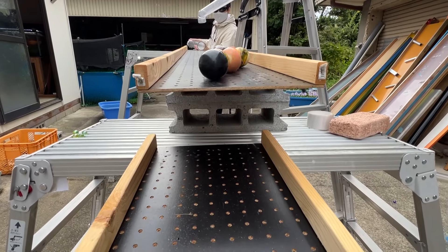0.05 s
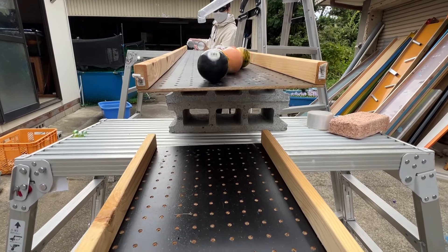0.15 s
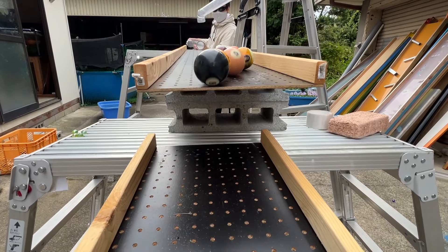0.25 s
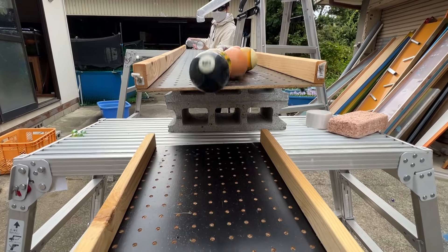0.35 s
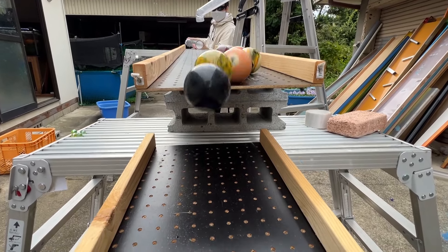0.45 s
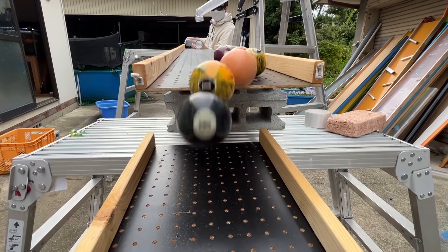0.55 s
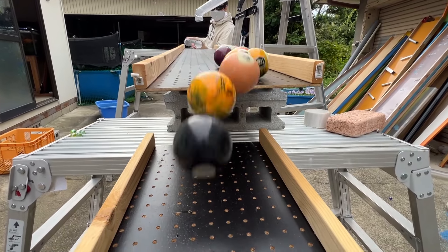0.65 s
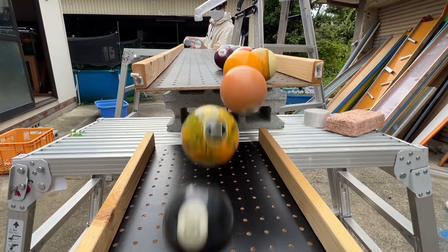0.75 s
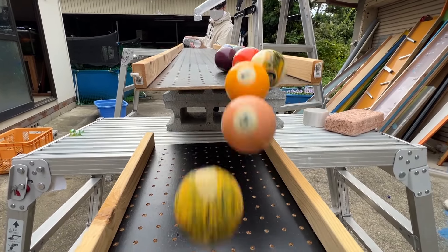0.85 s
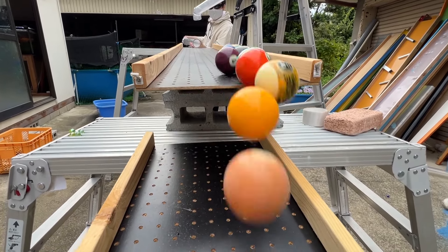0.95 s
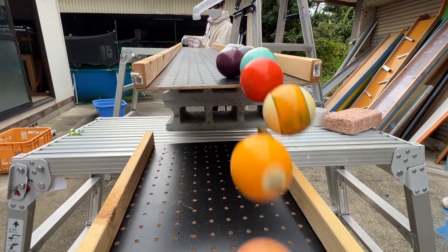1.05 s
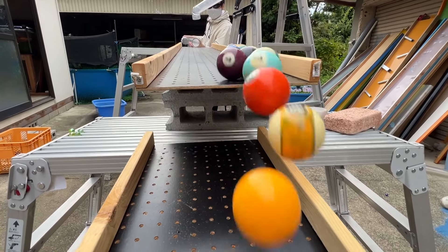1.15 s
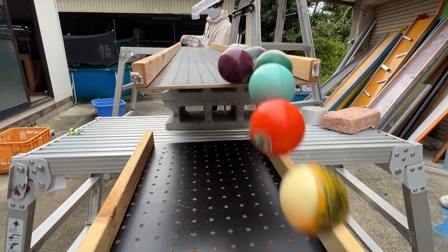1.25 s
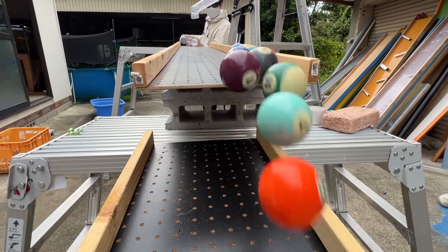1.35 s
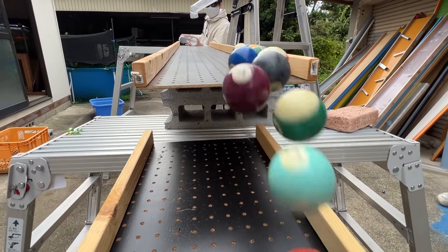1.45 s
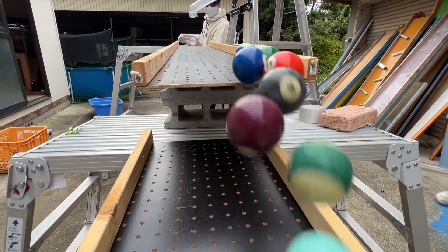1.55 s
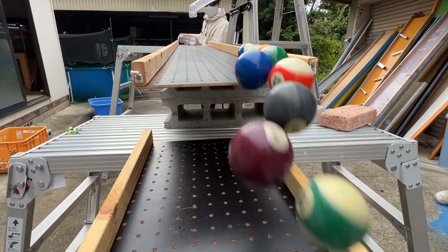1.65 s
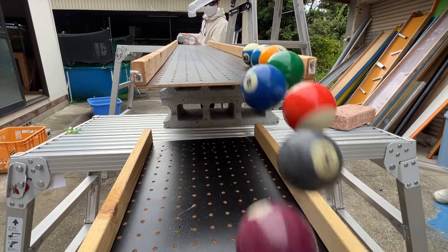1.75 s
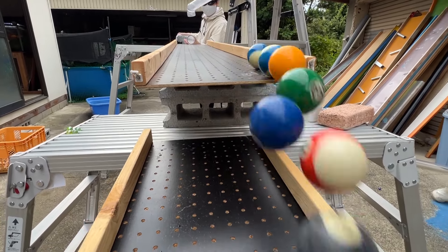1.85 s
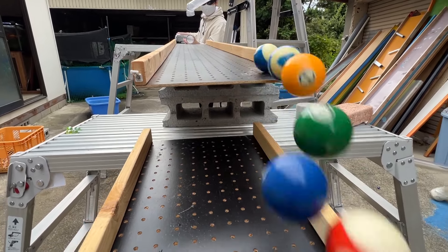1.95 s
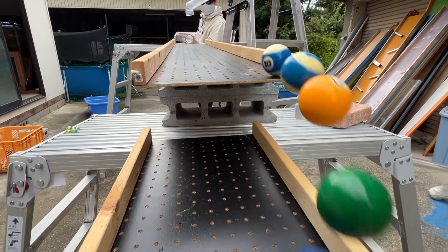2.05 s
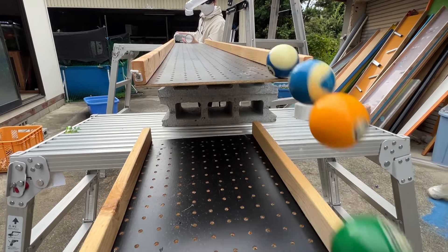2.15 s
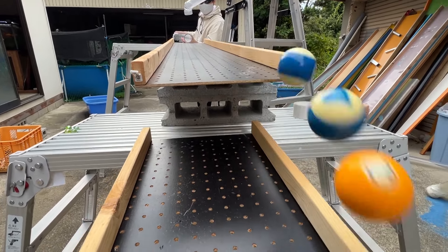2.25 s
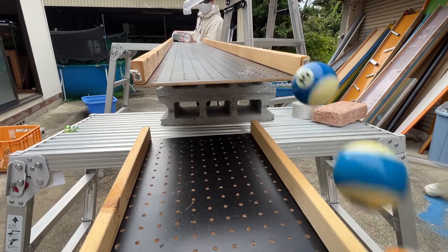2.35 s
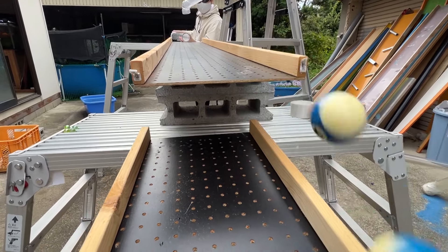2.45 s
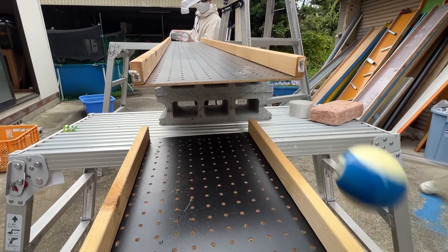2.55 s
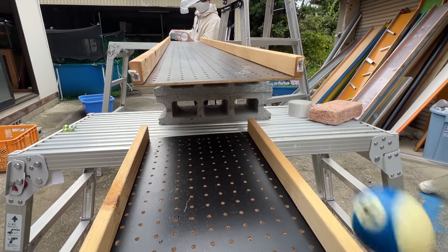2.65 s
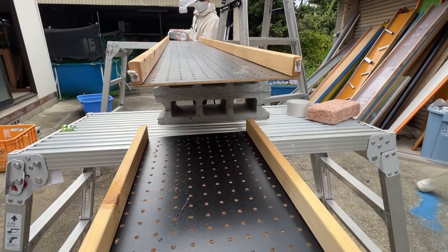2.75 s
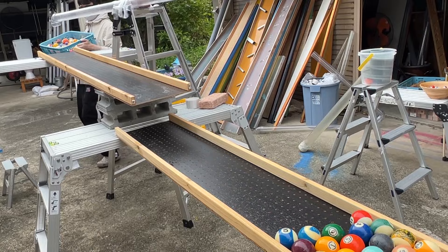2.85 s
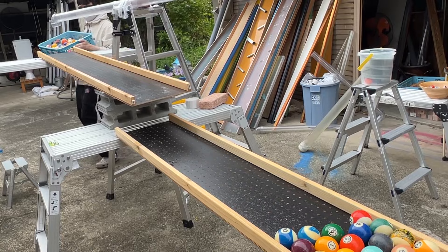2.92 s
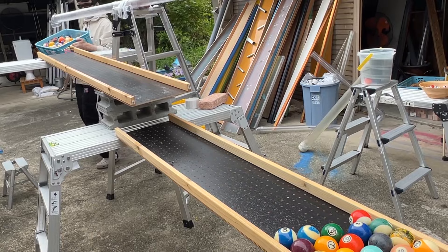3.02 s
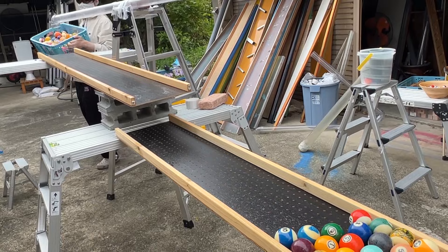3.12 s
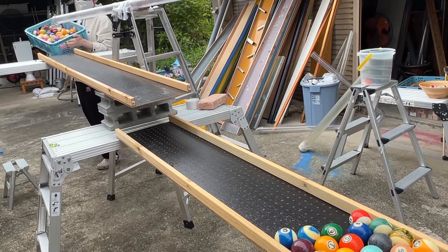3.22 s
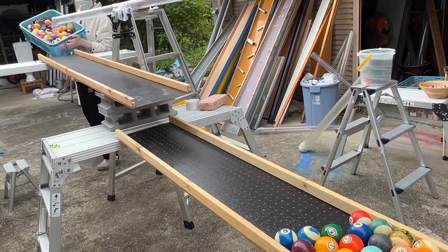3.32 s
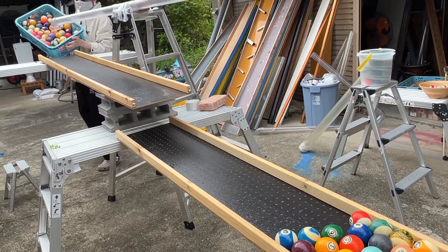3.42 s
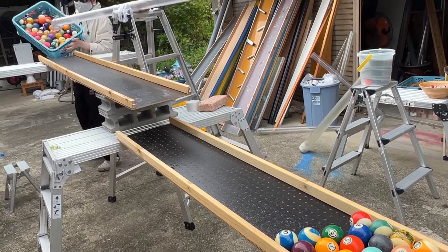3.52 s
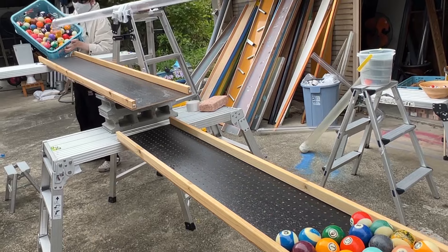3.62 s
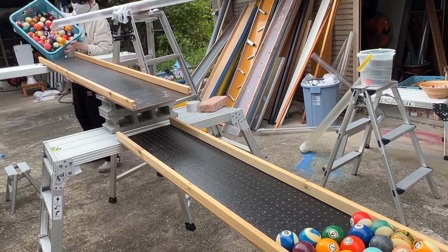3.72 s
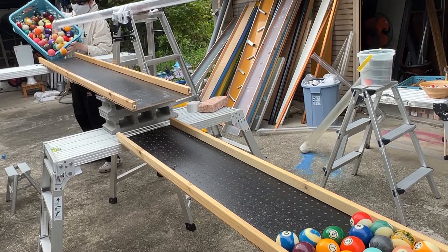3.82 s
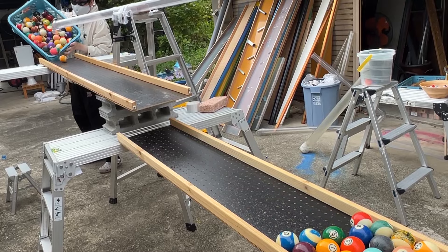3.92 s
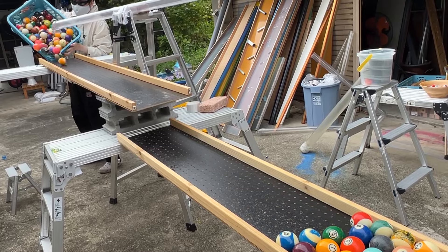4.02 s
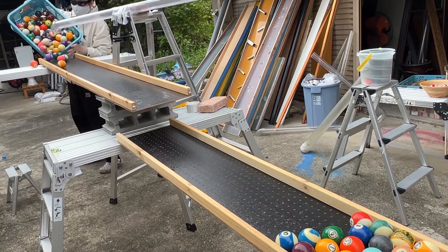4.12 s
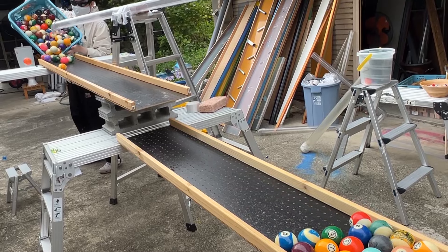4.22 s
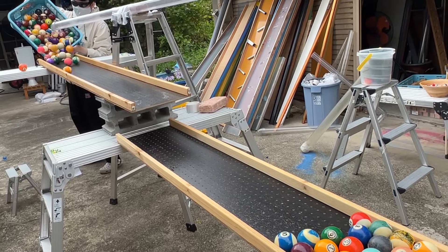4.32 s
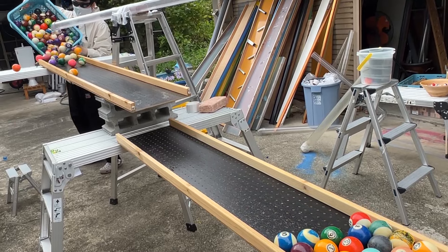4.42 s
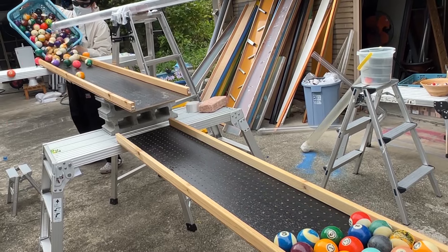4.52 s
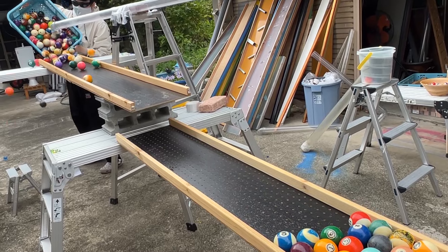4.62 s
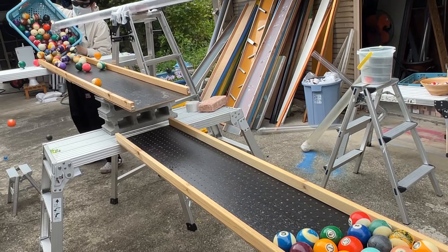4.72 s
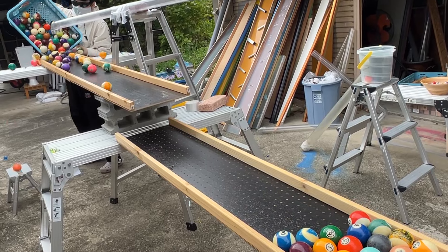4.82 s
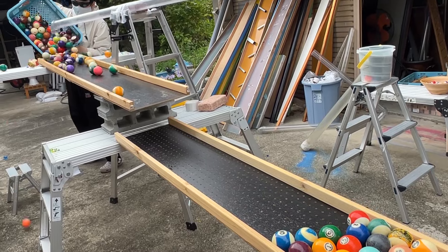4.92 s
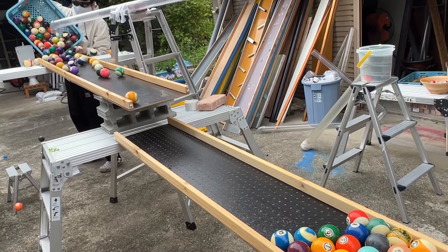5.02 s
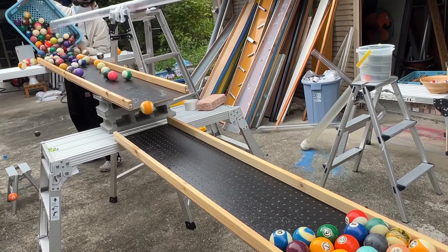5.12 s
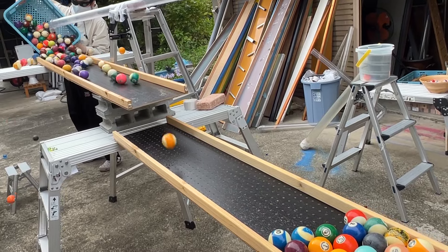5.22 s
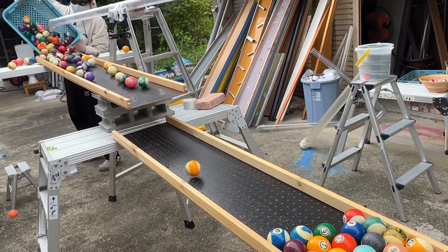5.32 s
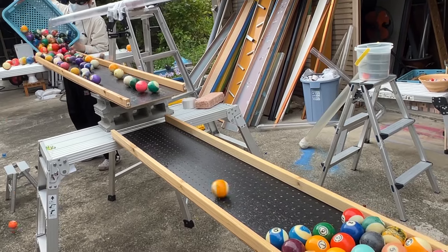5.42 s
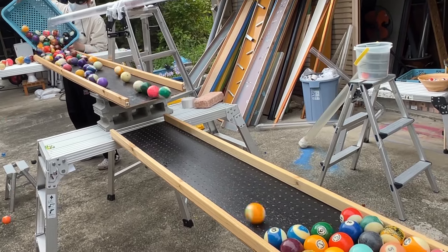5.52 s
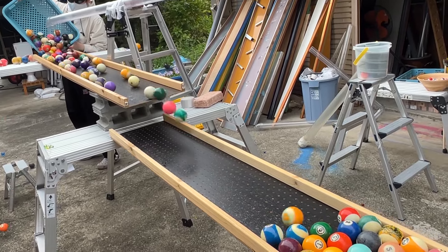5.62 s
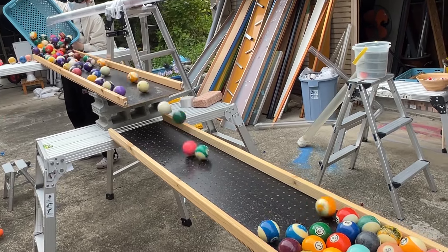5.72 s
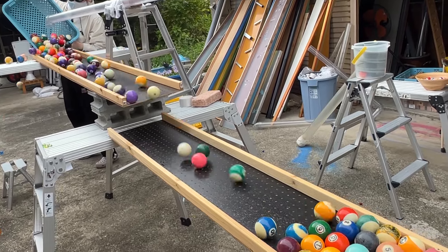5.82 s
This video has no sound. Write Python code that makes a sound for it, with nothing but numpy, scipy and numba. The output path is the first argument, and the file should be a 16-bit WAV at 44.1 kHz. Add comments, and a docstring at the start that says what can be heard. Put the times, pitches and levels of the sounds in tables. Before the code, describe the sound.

From 0 to 2.9 s the sound is slowed, deep and dull, with no high treble. Heavy hard balls roll on a perforated board: a faint low hum and rumble, with one soft hollow bump at the start and a weak clack at 0.7 s. From 1.0 s balls land on the lower chute about every tenth of a second, each a snap, a board shake and a thump falling in pitch, mixed with hollow wooden knocks, muffled clacks and bumpy rolling close to the microphone. Landings thin slightly after 2.4 s. At 2.9 s a hard cut: quiet outdoor hiss, normal speed, more distant. Small ticks begin near 3.4 s, growing by 3.9 s into a dense, bright clatter of small balls pouring from a basket. Surges come at 4.2, 4.4-5.0, 5.3 and 5.8 s, with drumming board rumble and sharp single knocks, continuing to the end at 6 s.

```python
"""Heavy balls roll over a perforated board, drop one by one onto a lower chute and clack in the pile.
This first scene sounds slowed down, deep and dull: filtered bumps and noise, damped rings, falling thumps.
After a hard cut, at normal speed and further off: a quiet yard of coloured noise, then a basket of small
balls pours onto the board. Swarms of tiny rings make the dense clatter; noise bursts, the slides and knocks."""
import sys
import numpy as np
from scipy import signal
from scipy.fft import rfft, irfft, next_fast_len
from scipy.io import wavfile
from numba import njit

SR = 44100
rng = np.random.default_rng(int(sys.argv[2]) if len(sys.argv) > 2 else 0)


def transcribe(u):
    """Save the signal u as a 16-bit wav file named by the first command-line argument.

    u: samples, shape (n,) or (channels, n), limited to [-1, 1]; the rate is SR.
    q: integer samples, one column per channel.
    """
    v = np.clip(np.atleast_2d(u).T, -1, 1)
    q = np.round(v * 32767).astype(np.int16)
    wavfile.write(sys.argv[1], SR, q)


N = 258867

# spectrum of the slowed rolling and drops, dull above 6 kHz: (frequency [Hz], relative gain [dB])
CHUTE_COLOUR = [(12, -40.5), (25, 7.5), (55, -1.5), (110, 1.5), (234, -1), (340, -2), (500, 4), (700, 6),
                (1270, -6), (2050, -10.5), (2600, -21), (3080, -38.5), (3470, -32.5), (4100, -47),
                (4730, -38), (5250, -52.5), (5600, -48), (6000, -67), (7800, -68), (13200, -120)]
# overall spectrum of the pour, with a narrow gap near 10 kHz: (frequency [Hz], relative gain [dB])
POUR_COLOUR = [(24, -43), (40, -19), (141, 1.5), (185, -6.5), (320, -3.5), (442, 2), (860, 2.5),
               (1900, 6.5), (2350, 4), (2800, -3), (3100, -11.5), (5300, -14), (8300, -21), (9400, -24),
               (10300, -42), (12000, -23), (16000, -50), (20000, -3)]


def undb(db):
    """Amplitude ratio of a level in dB."""
    return 10 ** (np.asarray(db) / 20)


def unit(x):
    """Scale to rms 1 over both channels."""
    return x / np.sqrt(np.mean(x ** 2))


def curves(table):
    """Columns of a table, interpolated over time at every sample."""
    time_s, *columns = np.transpose(table)
    return [np.interp(np.arange(N) / SR, time_s, column) for column in columns]


def band(x, lo_hz, hi_hz, order=2):
    """Butterworth band-pass."""
    return signal.sosfilt(signal.butter(order, [lo_hz, hi_hz], "band", fs=SR, output="sos"), x)


def colour(x, points):
    """Causal filter with the given spectrum, from the cepstrum of its log gain."""
    hz, db = np.transpose(points)
    f = np.fft.rfftfreq(4096, 1 / SR) + 1  # +1 Hz keeps the log finite
    log_gain = np.interp(np.log(f), np.log(hz), db) * np.log(10) / 20
    # fold the cepstrum onto positive time: minimum phase
    cepstrum = irfft(log_gain)
    cepstrum[1:2048] *= 2
    cepstrum[2049:] = 0
    impulse = irfft(np.exp(rfft(cepstrum)))
    return signal.oaconvolve(x, impulse[None], axes=1)[:, :N]


def pair(alike):
    """Noise for two microphones that share the power fraction alike."""
    common, left, right = rng.standard_normal((3, N))
    return np.sqrt(alike) * common + np.sqrt(1 - alike) * np.array([left, right])


def grains(rate, spread_db, tail_s):
    """Envelope of random little impacts, rate per second, each with a short tail; rms 1."""
    hit, size = rng.random(N) < rate / SR, rng.exponential(size=N)
    impacts = hit * undb(2 * spread_db * size)
    power = signal.lfilter([1], [1, -np.exp(-1 / (tail_s * SR))], impacts)
    return unit(np.sqrt(power + 1e-9))


def bursts(times_s, level_db, t60_s, rise_s):
    """Envelope of blows that rise quickly and die away; powers add."""
    power, t = np.zeros(N + SR), np.arange(SR // 4) / SR
    for at_s, db, decay_s in zip(times_s, level_db, t60_s):
        i = int(at_s * SR)
        decay = undb(2 * db - 120 * t / max(decay_s, .01))
        power[i:i + len(t)] += decay * (1 - np.exp(-t / rise_s)) ** 2
    return np.sqrt(power[:N])


def placed(x, lag, left_db):
    """Left microphone later by lag samples and louder by left_db."""
    return np.array([np.roll(x[0], lag), x[1]]) * undb([[left_db / 2], [-left_db / 2]])


@njit
def ring(at, hz, t60_s, size, count):
    """Damped sines started at given samples; at and size have one column per channel."""
    out = np.zeros((2, count))
    for k in range(len(hz)):
        # one sample of rotation and decay
        step = np.exp(2j * np.pi * hz[k] / SR - np.log(1000) / (t60_s[k] * SR))
        for c in range(2):
            z = size[k, c] + 0j
            for i in range(at[k, c], min(count, at[k, c] + int(.7 * t60_s[k] * SR))):
                if i >= 0:
                    out[c, i] += z.imag
                z *= step
    return out


def pings(time_s, hz, t60_s, level_db):
    """Damped rings, the same at both microphones."""
    both = np.ones((len(time_s), 2))
    at = (time_s[:, None] * both * SR).astype(np.int64)
    return ring(at, hz + 0., t60_s + 0., undb(level_db)[:, None] * both, count=N)


def swarm(span_s, rate, lo_hz, hi_hz, cycles, spread_db, lag_s):
    """Many small impacts, each ringing a few cycles at its own pitch and place; flat spectrum, rms 1."""
    start_s, length_s = span_s[0], span_s[1] - span_s[0]
    when, pitch, size, place, ringing = rng.random((int(rate * length_s), 5)).T
    hz = lo_hz * (hi_hz / lo_hz) ** pitch
    side = np.stack([place - .5, .5 - place], axis=1)
    at = ((start_s + when[:, None] * length_s + lag_s * side) * SR).astype(np.int64)
    level_db = -spread_db * np.log(size + 0.078) + 20 * np.log10(hz)
    gain = undb(level_db)[:, None] * undb(1.7 * side)
    return unit(ring(at, hz, cycles * (.5 + ringing) / hz, gain, count=N))


def rolling():
    """Holes under the balls bump the board; far balls hum in the upper board, near ones rattle the chute."""
    # rolling on the chute: (time [s], rumble level [dB], rattle level [dB])
    roll_levels = [(0.95, -21, -18), (1.02, -32, -37), (1.134, -24, -25.5), (1.22, -21.5, -22.5),
                   (1.504, -19.5, -21.5), (1.77, -21, -22.5), (2.204, -19.5, -22), (2.666, -22, -25.5),
                   (2.736, -19.5, -23.5), (2.85, -21, -27.5), (2.9, -20.5, -20)]
    # spectrum of the slowed upper rolling, with narrow treble gaps: (frequency [Hz], relative gain [dB])
    upper_colour = [(12, -54), (20, -12.5), (59, -8), (145, -1), (334, -11), (501, -8), (684, -20.5),
                    (1780, -30.5), (3000, -46.5), (3470, -57), (4100, -65), (4730, -47), (5250, -65),
                    (5590, -52), (6000, -72), (7800, -104), (13200, -120)]
    # rolling on the upper board: (time [s], level [dB])
    upper_levels = [(0.0, -28.5), (0.046, -32), (0.102, -33), (0.5, -30.5), (0.91, -29), (1.0, -37)]
    # thin treble hiss above the rolling: (time [s], level [dB])
    hiss_levels = [(0.0, -67), (1.06, -67), (1.13, -60.5), (1.36, -48), (1.7, -53), (2.0, -61.5),
                   (2.41, -52.5), (2.9, -63)]
    t = np.arange(N) / SR
    rumble_db, rattle_db = curves(roll_levels)
    bumps = swarm((0, 3), 4000, 114.7, 6750, cycles=8.1, spread_db=5.2, lag_s=0.00052) + 2.14 * pair(0.41)

    chute = colour(bumps, CHUTE_COLOUR) * np.clip((t - .93) / 0.11, 0, 1)
    chute = chute * grains(180, spread_db=1.4, tail_s=0.019)
    rumble = unit(band(chute, 4.3, 687)) * undb(rumble_db)
    rattle = unit(band(chute, 700, 10000)) * undb(rattle_db)

    upper = unit(colour(bumps + 1.7 * pair(0.26), upper_colour)) * undb(curves(upper_levels)[0])
    # hum of the lowest strong mode, fading 32 dB/s
    hum = unit(band(bumps, 151.683, 158.207)) * undb(-28.5 - 32 * t)
    upper = (upper + hum) * np.clip((1.06 - t) / 0.097, 0, 1)

    fizz = colour(pair(0.13) * grains(900, spread_db=2.2, tail_s=0.004), CHUTE_COLOUR)
    hiss = unit(band(fizz, 3340, 4100, order=4)) + undb(-9.0) * unit(band(fizz, 4300, 5950, order=4))
    hiss = hiss * undb(curves(hiss_levels)[0])

    near = placed(rumble, lag=37, left_db=7.5) + placed(rattle + hiss, lag=34, left_db=2.0)
    return placed(upper, lag=38, left_db=7.0) + near


def hollow():
    """Hollow knocks: short pitched rings of the trough, its rails and the chute."""
    # hollow knocks: (time [s], level [dB], pitch [Hz], t60 [s])
    hollow_knocks = [(0.036, -18, 151, 0.15), (1.0232, -11, 552, 0.062), (1.089, -15, 593, .06),
                     (1.152, -29, 732, 0.054), (1.2835, -8, 700, 0.047), (1.383, -15.5, 253, 0.15),
                     (1.419, -18, 221, .19), (1.42, -11, 670, 0.039), (1.443, -19, 482, .06),
                     (1.468, -15.5, 217, .15), (1.49, -15, 241, 0.15), (1.561, -16.5, 238, 0.091),
                     (1.536, -13, 429, 0.094), (1.634, -10, 450, 0.048), (1.66, -14, 414, 0.058),
                     (1.796, -15, 480, .06), (1.852, -19, 400, .06), (1.9095, -8.5, 500, 0.046),
                     (2.0175, -4, 685, .07), (2.107, -19, 427, 0.044), (2.182, -11.5, 453, .05),
                     (2.212, -10, 167, 0.14), (2.282, -12, 803, 0.076), (2.374, -8.5, 185, 0.15),
                     (2.374, -12.5, 395, 0.072), (2.44, -16, 396, .07), (2.502, -13, 600, 0.046),
                     (2.609, -22, 310, .1), (2.636, -14, 389, 0.098), (2.659, -11, 714, 0.14),
                     (2.669, -16, 693, 0.065), (2.684, -14, 806, 0.083), (2.671, -10, 800, 0.17),
                     (2.722, -14, 640, 0.063), (2.729, -9.5, 467, 0.087), (2.764, -16, 409, .12),
                     (2.785, -15.5, 262, 0.075), (2.829, -17, 200, 0.14), (2.83, -13.5, 395, 0.095),
                     (2.856, -11.5, 462, 0.11)]
    time_s, db, hz, t60_s = np.transpose(hollow_knocks)
    return placed(-pings(time_s, hz, t60_s, db), lag=38, left_db=8)


def clacks():
    """Two hard balls touch: a short ping, higher rings and a spray of treble."""
    # ball on ball: (time before a common 1 ms delay [s], ping level [dB], treble level [dB])
    contacts = [(0.6938, -36, -40.5), (1.019, -24, -20), (1.045, -51, -57), (1.149, -28, -26.5),
                (1.162, -38, -46), (1.177, -35.5, -30), (1.1903, -31.5, -34), (1.281, -18.5, -31),
                (1.311, -25.5, -24), (1.4178, -27, -29), (1.44, -19.5, -37), (1.4816, -28, -44),
                (1.533, -29, -20.5), (1.559, -23, -27), (1.6571, -20, -20.5), (1.6834, -20.5, -31),
                (1.7954, -22, -23), (1.8558, -35, -43), (1.907, -28, -23.5), (1.9324, -22.5, -26),
                (1.969, -17, -28), (2.016, -29, -30), (2.027, -31, -33), (2.046, -27, -36),
                (2.05, -37, -29), (2.061, -39, -30), (2.1033, -23.5, -24.5), (2.1297, -35, -45),
                (2.1792, -32, -28), (2.186, -41, -41), (2.21, -26, -27), (2.235, -30, -26),
                (2.28, -21, -27), (2.304, -39.5, -30.5), (2.373, -37, -31), (2.3836, -37, -38),
                (2.4015, -42, -33), (2.422, -40, -41), (2.442, -34, -34), (2.5048, -36.5, -39),
                (2.562, -31, -43), (2.64, -30.5, -43), (2.6914, -31.5, -45), (2.8263, -47, -29),
                (2.8347, -34, -27)]
    # higher rings: (mean frequency [Hz], mean level re treble [dB])
    upper_rings = [(4650, -11), (5600, -20.5)]
    time_s, ping_db, treble_db = np.transpose(contacts)
    drift, same = rng.standard_normal((len(time_s), 5)).T, np.ones(len(time_s))
    time_s = time_s + 0.001035
    out = pings(time_s, 3506 * (1 + 0.019 * drift[0]), 0.014 * same, ping_db)
    for (upper_hz, mode_db), detune, vary in zip(upper_rings, drift[1:3], drift[3:]):
        hz = upper_hz * (1 + 0.0084 * detune)
        out = out + pings(time_s, hz, 0.024 * same, treble_db + mode_db + 3 * vary)

    spray = unit(band(colour(pair(.5), CHUTE_COLOUR), 2700, 6000, order=3))
    attack = bursts(time_s, treble_db, 0.074 * same, rise_s=0.00025)
    tail = bursts(time_s, ping_db - 20.5, 0.08 * same, rise_s=0.0017)
    return placed(out + spray * (attack + tail), lag=38, left_db=-0.5)


def lead_in():
    """A few steady noise bands swell just before the first ball lands."""
    # swelling bands: (centre [Hz], relative level [dB])
    swell_bands = [(1050, -43), (1324, -41), (1588, -34), (1949, -41), (2390, -58)]
    from_s, to_s = 0.94, 1.021
    t, noise = np.arange(N) / SR, pair(0.62)
    swell = np.clip((t - from_s) / (to_s - from_s), 0, 1) ** 3.2 * undb(10.0)
    swell = swell * np.clip((to_s + 0.012 - t) / 0.0036, 0, 1)
    return swell * sum(undb(db) * unit(band(noise, .98 * hz, 1.02 * hz)) for hz, db in swell_bands)


def drops():
    """A landing snaps, shakes the board, then the chute flexes in a falling thump."""
    # landings: (time [s], board [dB], thump [dB], crack [dB], board t60 [s]); levels before the trims below
    landings = [(1.0228, -13, -12.5, -13, 0.073), (1.088, -12, -28, -30, 0.1),
                (1.1521, -7.5, -12, -22, 0.062), (1.171, -17.5, -19.5, -33, 0.44),
                (1.2829, -6.5, -9.5, -12, 0.15), (1.311, -13.5, -30, -20.5, 0.28),
                (1.387, -15.5, -20, -36, 0.065), (1.42, -13, -17, -11, 0.098),
                (1.475, -13.5, -22, -40, 0.075), (1.5357, -9, -16, -17, 0.19),
                (1.564, -17, -32, -16, 0.089), (1.6593, -9.5, -12.5, -12.5, 0.14),
                (1.687, -11.5, -32, -17, 0.14), (1.796, -6, -15.5, -13, 0.055),
                (1.9095, -16, -14, -10.5, 0.13), (1.969, -11.5, -22, -41, 0.11),
                (2.017, -6, -9.5, -13, 0.1), (2.051, -14.5, -32, -18.5, 0.19),
                (2.104, -11, -17, -15, 0.043), (2.211, -10.5, -15.5, -16.5, 0.1),
                (2.282, -8, -24, -15, 0.13), (2.374, -11, -30, -14.5, 0.14), (2.438, -21.5, -20, -22, 0.74),
                (2.638, -13, -22, -22.5, 0.27), (2.659, -20, -32, -45.5, 0.095),
                (2.686, -20, -28, -36, 0.38), (2.828, -16, -30, -15.5, 0.78),
                (2.856, -10, -20, -21.5, 0.054)]
    # board modes at first contact: (frequency [Hz], level re board [dB], t60 [s])
    snap_modes = [(238, -1, 0.037), (450, -1, 0.021), (770, -5.5, 0.0085), (1070, -8, 0.012)]
    time_s, board_db, thump_db, crack_db, t60_s = np.transpose(landings)
    same = np.ones(len(time_s))

    shake = colour(pair(0.22) * grains(2500, spread_db=0.76, tail_s=0.0015), CHUTE_COLOUR)
    board = unit(band(shake, 330, 1500)) * bursts(time_s, board_db - 5, t60_s, rise_s=.002)

    crack = unit(band(shake, 1500, 6000)) * bursts(time_s, crack_db - 4.5, 0.067 * same, rise_s=0.00048)
    ring_hz = 2067 * (1 + .06 * rng.standard_normal(len(time_s)))
    crack = crack + pings(time_s + 0.00201, ring_hz, 0.055 * same, crack_db - 5)
    crack = crack + pings(time_s, ring_hz, 0.042 * same, crack_db - 16.5)

    snap = -sum(pings(time_s, hz * same, ring_s * same, board_db + db) for hz, db, ring_s in snap_modes)
    snap = band(snap, 100, 1600, order=3)  # a heavy ball pushes for about a millisecond

    thump, t = np.zeros(N + SR), np.arange(SR // 4) / SR
    for at_s, db, (start, glide) in zip(time_s, thump_db, rng.random((len(time_s), 2))):
        hz = 24 + (140 + 30 * start) * np.exp(-t / (0.0136 + 0.0064 * glide))
        hz = hz + 420 * np.exp(-t / 0.00359)  # the lows arrive late along the board
        level = undb(db + 2 - 60 * t / 0.21) * (1 - 0.5 * np.exp(-t / 0.01))  # swells as the pitch falls
        i = int((at_s + 0.00028) * SR)
        thump[i:i + len(t)] -= level * np.sin(2 * np.pi * np.cumsum(hz) / SR)
    return placed(board + snap + thump[:N], lag=31, left_db=10.0) + placed(crack, lag=43, left_db=6.5)


def yard():
    """Quiet outdoor hiss with faint rustling: coloured noise under a grainy envelope."""
    # yard spectrum: (frequency [Hz], relative gain [dB])
    yard_spectrum = [(18, -15), (30, 5), (60, 10), (127, 5.5), (144, 6), (376, -4), (1140, -7), (1600, -11),
                     (2710, -12.5), (9500, -24.5), (12400, -95), (20900, -120)]
    return unit(colour(pair(0.15) * grains(500, spread_db=0.5, tail_s=0.019), yard_spectrum)) * undb(-45)


def knocks():
    """Single balls hit rails and chute, nearer and sharper than the clatter: noise bursts and a ping."""
    # knocks: (time [s], mid [dB], low [dB], treble [dB], ping [Hz], ping level [dB])
    single_hits = [(2.9402, -49, -45, -44, 2460, -50), (2.96, -44, -42, -42, 850, -40),
                   (3.3423, -39, -72, -52, 1120, -40), (3.434, -32, -37, -43, 2360, -30),
                   (3.4695, -29, -47, -32, 2460, -26), (3.511, -38, -46, -28, 1840, -39),
                   (3.692, -43, -38, -32, 2370, -37), (3.927, -18, -13, -10.5, 2470, -13),
                   (4.053, -36, -19.5, -20, 2060, -37), (4.1616, -27, -43, -20, 2240, -30),
                   (4.187, -23, -19, -25, 610, -9.5), (4.203, -9, -21, -16, 1000, -23),
                   (4.224, -10.5, -31, -24, 2120, -25), (4.384, -17, -37, -40, 2380, -22.5),
                   (4.5534, -35, -25, -37, 2350, -13), (4.623, -18, -35, -26, 2450, -19),
                   (4.671, -24, -38, -20, 2500, -22), (4.7182, -26, -21, -26, 2110, -21),
                   (4.817, -22, -23, -24, 2300, -22), (5.007, -28, -34, -27, 2420, -28),
                   (5.2303, -31, -36, -17, 1186, -20), (5.3342, -24, -15, -12, 1160, -5),
                   (5.337, -30, -20, -30, 1190, -14), (5.34, -30, -30, -34, 222, -10.5),
                   (5.3429, -30, -27, -34, 920, -11), (5.35, -30, -23, -34, 446, -14),
                   (5.355, -30, -25, -36, 400, -20), (5.3466, -30, -21, -34, 1860, -9),
                   (5.386, -19, -27, -18, 2330, -29), (5.635, -11, -21, -32, 1100, -14.5),
                   (5.773, -24, -11.5, -17, 1010, -13.5), (5.776, -30, -30, -30, 300, -13),
                   (5.806, -30, -30, -30, 210, -14), (5.816, -30, -30, -30, 190, -19),
                   (5.8022, -21, -12.5, -16, 990, -9), (5.8239, -19, -22, -22, 940, -9),
                   (5.835, -28, -24, -25, 905, -13), (5.849, -23, -34, -12, 1020, -11.5)]
    # decay times: (low t60 [s], mid t60 [s], treble t60 [s], ping t60 [s])
    decays_s = (0.095, 0.021, 0.087, 0.024)
    time_s, mid_db, low_db, treble_db, ping_hz, ping_db = np.transpose(single_hits)
    low_t60_s, mid_t60_s, treble_t60_s, ping_t60_s = np.outer(decays_s, np.ones(len(time_s)))
    shake = pair(0.24) * grains(4000, spread_db=2.2, tail_s=0.01)
    low = unit(band(shake, 150, 1300)) * bursts(time_s + .002, low_db, low_t60_s, rise_s=.001)
    mid = unit(band(shake, 1300, 3500)) * bursts(time_s, mid_db, mid_t60_s, rise_s=.0007)
    treble = unit(colour(band(shake, 5900, 18300), POUR_COLOUR))
    treble = treble * bursts(time_s, treble_db, treble_t60_s, rise_s=0.00097)
    return low + mid + treble + pings(time_s + 0.00183, ping_hz, ping_t60_s, ping_db)


def pour():
    """Many small balls tick against each other and drum on the board, blurred by a wash of noise."""
    # steady flow from the basket: (time [s], clatter [dB], board rumble [dB], treble [dB])
    flow_levels = [(3.43, -41, -45, -50), (3.55, -30.5, -47.5, -38.5), (3.63, -32, -44, -48),
                   (3.72, -25, -43.5, -33.5), (3.9, -23.5, -33, -29.5), (4.3, -24.5, -31.5, -24),
                   (4.75, -24.5, -31.5, -27), (5.2, -23.5, -30, -24), (5.55, -24.5, -32, -26),
                   (5.87, -30, -35, -33.5)]
    # a heap of balls slides at once: (time [s], clatter [dB], board rumble [dB], treble [dB])
    slides = [(3.437, -33.5, -55, -28), (3.79, -21, -35, -31), (3.924, -25, -24.5, -19.5),
              (4.16, -26, -28, -24), (4.18, -14, -20, -13.5), (4.38, -19, -29, -25),
              (4.41, -30, -45, -23.5), (4.548, -19.5, -27.5, -18), (4.626, -19.5, -35, -16),
              (4.705, -18, -28, -16), (4.805, -19, -33, -17.5), (5, -18, -40, -17.5), (5.13, -26, -42, -26),
              (5.24, -21.5, -32, -21.5), (5.335, -17, -22, -30), (5.625, -20.5, -36, -27),
              (5.771, -13.5, -20.5, -20), (5.848, -18, -43, -18)]
    # rings of the small balls: (nominal pitch, sounding 3-5 % lower [Hz], relative level [dB])
    ball_rings = [(2310, -14.5), (4150, -24), (4820, -26), (5440, -28), (6800, -44), (7700, -47),
                  (8250, -25.5)]
    t, span_s = np.arange(N) / SR, (3, 6)
    time_s, *slide_db = np.transpose(slides)
    t60_s = np.full(len(time_s), 0.44)
    mid, low, treble = (np.hypot(undb(steady_db), bursts(time_s, db, t60_s, rise_s=0.0039))
                        for steady_db, db in zip(curves(flow_levels), slide_db))
    flow = np.clip((t - 3.39) / 0.038, 0, 1)

    wash = 1.85 * pair(0.06) * grains(2500, spread_db=2.2, tail_s=0.0029)
    contacts = swarm(span_s, 9000, 713.0, 16100, cycles=47, spread_db=0.51, lag_s=.0012)
    clatter = colour(contacts + wash, POUR_COLOUR)
    drum = swarm(span_s, 1000, 132.5, 1140, cycles=14.7, spread_db=1.3, lag_s=0.00074) + 4.9 * pair(0.9)
    drum = colour(drum, POUR_COLOUR)
    low = placed(low * unit(band(drum, 37, 770)), lag=0, left_db=6.5)

    rings = sum(undb(db) * swarm(span_s, 150, 0.95 * hz, 0.97 * hz, cycles=91, spread_db=2.7, lag_s=.0012)
                for hz, db in ball_rings)
    clicks = swarm(span_s, 600, 970, 5100, cycles=7.9, spread_db=2.3, lag_s=0.00065)
    clicks = unit(band(clicks, 830, 3300))  # dry single contacts
    mid = mid * (0.8 * unit(band(clatter, 900, 3400, order=3)) + rings + 0.55 * clicks)

    # nearer balls stand out
    sharp = swarm(span_s, 500, 3200, 9300, cycles=45, spread_db=3.5, lag_s=.0003)
    sharp = unit(colour(sharp, POUR_COLOUR))
    treble = treble * unit(unit(band(clatter, 3400, 18000, order=3)) + .42 * sharp)

    # the first small balls reach the lower chute
    arrive = np.clip((t - 4.24) / 2.6, 0, 1)
    chute = arrive * unit(band(drum, 124.44, 342.21)) * undb(-36)
    return flow * (low + mid + treble + chute)


def ticks():
    """Two small balls meet, clear of the clatter: two short rings."""
    # single contacts: (time [s], ring [Hz], ring level [dB], higher ring [Hz], higher ring level [dB])
    ball_contacts = [(3.444, 3740, -38, 6440, -27), (3.466, 3220, -25, 7751, -28),
                     (3.476, 5167, -35, 6100, -31), (3.511, 4950, -31, 8250, -38),
                     (3.548, 2080, -26, 8300, -35), (3.653, 3440, -39, 5000, -38),
                     (3.661, 3080, -39, 7000, -36), (3.693, 5470, -28, 8500, -38),
                     (3.696, 4750, -26, 6500, -36), (3.724, 2239, -19, 3280, -28),
                     (3.798, 4134, -27, 7751, -38), (3.81, 4134, -27, 5460, -33),
                     (3.865, 2200, -22, 4200, -26), (3.9275, 7500, -20, 8500, -16),
                     (3.9305, 4823, -11, 5857, -12), (4.054, 5000, -17.5, 8200, -31),
                     (4.064, 6890, -21, 8200, -30), (4.071, 6546, -21, 8200, -32),
                     (4.185, 4750, -17, 9050, -24), (4.194, 4870, -16, 6718, -19),
                     (4.203, 5300, -10, 7751, -24), (4.2065, 4270, -9.5, 5300, -11),
                     (4.284, 2300, -19, 4800, -15), (4.383, 2180, -20, 4150, -26),
                     (4.444, 6201, -22, 8140, -19), (4.554, 4100, -25, 5200, -23),
                     (4.561, 4100, -24, 6760, -29), (4.716, 5450, -17, 6800, -19),
                     (4.717, 4306, -22, 8700, -30), (4.7235, 5300, -18, 6900, -28),
                     (4.821, 4330, -27, 8268, -21), (5.026, 6640, -21, 8096, -20),
                     (5.138, 2390, -14.5, 4760, -20), (5.237, 5800, -18, 8300, -27),
                     (5.334, 3480, -16, 4100, -13), (5.338, 4130, -21, 7751, -22),
                     (5.346, 2700, -25, 8200, -21), (5.363, 960, -9, 2290, -21),
                     (5.568, 4930, -23, 8200, -34), (5.641, 1550, -16, 3445, -24),
                     (5.7715, 4100, -20, 8200, -20), (5.7755, 2780, -28, 7235, -26),
                     (5.784, 1180, -13, 2500, -29), (5.801, 4060, -26, 6300, -25),
                     (5.808, 4500, -15.5, 6800, -26), (5.849, 4500, -7.5, 8800, -17),
                     (5.851, 2700, -10, 5730, -16)]
    time_s, hz, db, higher_hz, higher_db = np.transpose(ball_contacts)
    t60_s = np.full(len(time_s), 0.028)
    return pings(time_s, hz, t60_s, db) + pings(time_s, higher_hz, 0.36 * t60_s, higher_db)


def ports(x):
    """Microphone ports: bass lags less at the left; the right one turns the phase of the deepest part."""
    frame_hz, lead_s = 390, 0.00055
    port_hz, port_q = 51.4, 1.8
    size = next_fast_len(N + SR)
    f = np.fft.rfftfreq(size, 1 / SR)
    lead = np.exp(2j * np.pi * f * lead_s / (1 + (f / frame_hz) ** 6))
    turn = port_hz ** 2 - f ** 2 - 1j * f * port_hz / port_q
    all_pass = turn / np.conj(turn)
    return irfft(rfft(x, size) * np.array([lead, all_pass]), size)[:, :N]


def scene():
    """Slowed heavy balls, then a hard cut to the yard and the pour."""
    cut_s = 2.888
    slowed = ports(rolling() + hollow() + clacks() + lead_in() + drops())
    # the right port hears the deepest bass weaker
    right_cut = signal.butter(1, 15., "high", fs=SR, output="sos")
    slowed = np.array([slowed[0], signal.sosfilt(right_cut, slowed[1])])
    # slowed playback also brings the top of the band down, here to 6 kHz
    slowed = signal.sosfilt(signal.ellip(8, .2, 80, 6000, fs=SR, output="sos"), slowed)

    normal = placed(pour() + knocks(), lag=-3, left_db=0.5) + ticks() + yard()
    # long waves reach both ports nearly alike; the deepest are cut
    side = (normal[0] - normal[1]) / 2
    low_side = signal.sosfilt(signal.butter(1, 400., fs=SR, output="sos"), side)
    normal = normal - 0.98 * low_side * np.array([[1], [-1]])
    normal = signal.sosfilt(signal.butter(2, 40., "high", fs=SR, output="sos"), normal)
    return np.where(np.arange(N) < cut_s * SR, slowed, normal)


def record(dry):
    """The loudest peaks are rounded and the top is cut at 16 kHz."""
    return signal.sosfilt(signal.ellip(8, .2, 70, 16000, fs=SR, output="sos"), np.tanh(dry))


dry = scene()
out = record(dry)
transcribe(out)
```